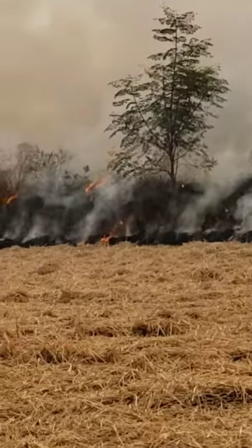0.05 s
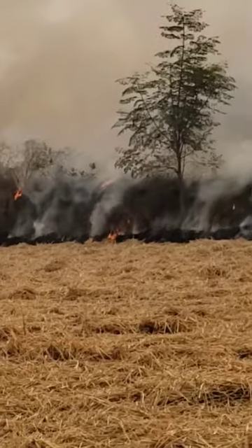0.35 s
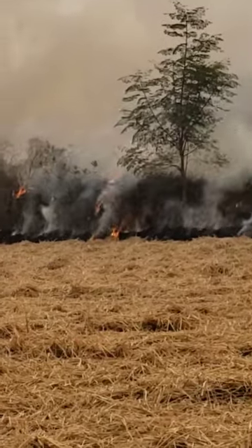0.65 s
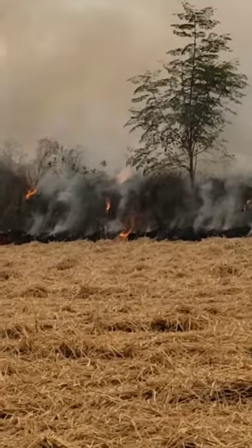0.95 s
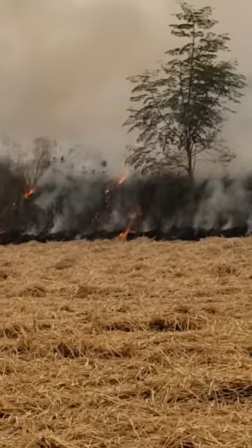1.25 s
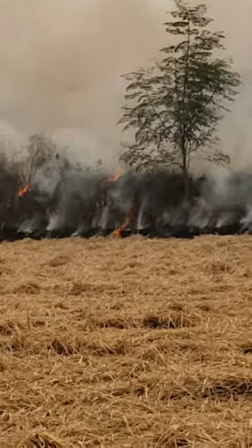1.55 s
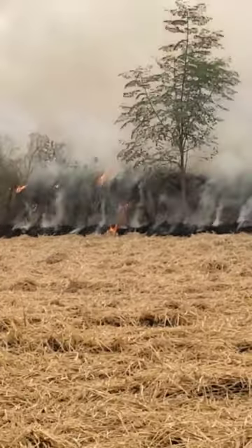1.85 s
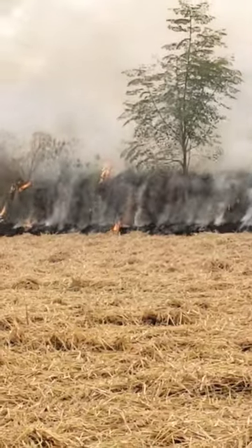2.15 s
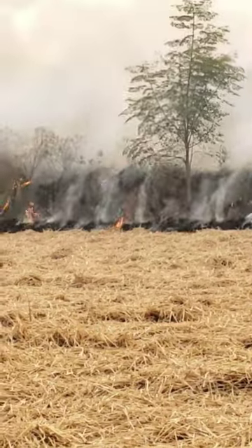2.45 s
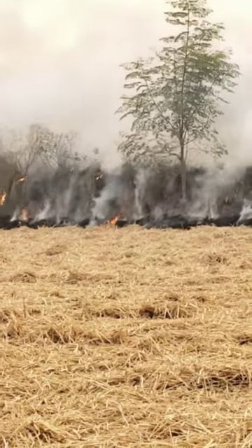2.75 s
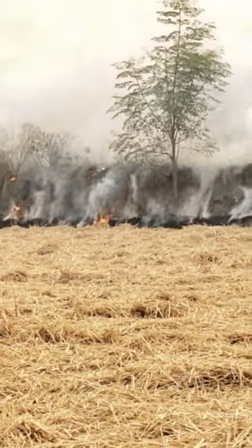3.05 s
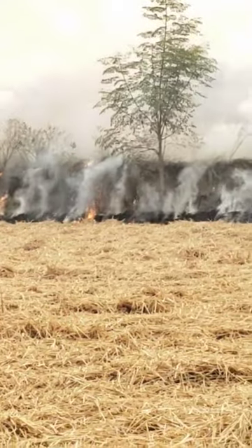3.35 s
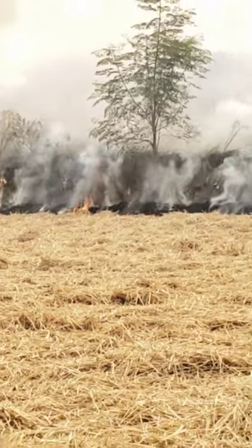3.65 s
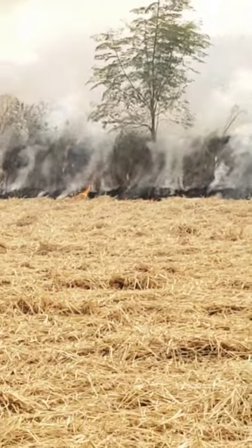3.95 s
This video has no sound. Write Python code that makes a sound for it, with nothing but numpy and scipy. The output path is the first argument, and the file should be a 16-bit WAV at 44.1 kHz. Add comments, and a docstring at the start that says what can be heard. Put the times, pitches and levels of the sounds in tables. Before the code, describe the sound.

A grass fire crackles steadily outdoors, left of the microphone, with frequent sharp snaps and a grainy hiss. The flames flutter softly over a low rumble of wind, and the crackling grows slightly stronger near the end.

```python
"""Sharp pops over dense crackle and sizzle: dry grass and straw burn at a field's edge, to the left.
Each bursting stalk radiates a shock of about one cycle, trailed by a few milliseconds of scatter from
the straw; countless tiny bursts superpose into hiss. Four dull thumps and one rustle lie among them.
The flames flutter with a soft roar; below them lie a wind rumble and a faint low drone."""
import sys
import numpy as np
from scipy.fft import rfft, irfft, next_fast_len
from scipy.io import wavfile
from scipy.ndimage import map_coordinates

SR = 44100
rng = np.random.default_rng(int(sys.argv[2]) if len(sys.argv) > 2 else 0)


def generate_wav(sig):
    """Save sig (samples, or channels by samples) to the path in sys.argv[1] as 16-bit PCM at SR."""
    pcm = np.round(np.clip(np.atleast_2d(sig).T, -1, 1) * 32767).astype(np.int16)
    wavfile.write(sys.argv[1], SR, pcm)


N = 176400
TOP_HZ = 15750  # band limit

# the loudest stalk bursts: t/s, shock peak level/dB, f/Hz, scatter re shock/dB
LOUD_BURSTS = [(0.0544, -13.5, 4930, 0), (0.1135, -18, 8100, -10), (0.1966, -2, 8900, -6),
               (0.3293, -18.5, 5010, -8), (0.4412, -9.5, 4540, -11), (0.6396, -19.5, 4630, 1),
               (0.7125, -11.5, 3530, -8), (0.7189, -10.5, 3020, -6.5), (0.7244, -18, 3000, 3),
               (0.7837, -14, 4300, -1), (0.7919, -4.5, 3650, -11), (0.7935, -12.5, 4000, -14),
               (0.8615, -14, 3480, -16), (0.9005, -11, 4860, 1.5), (0.9817, -20, 2900, -7),
               (1.0789, -15.5, 4280.0, -17), (1.1522, -13.5, 4370.0, -5), (1.1716, -16, 4770, 3),
               (1.2793, -20, 2800, 0), (1.3606, -16, 2150, -2.5), (1.4172, -11.5, 5170, -4),
               (1.4684, -13.5, 3820, -7), (1.4922, -10.5, 6400, -3), (1.5222, -14, 4930, -4),
               (1.677, -16, 4360, -5), (1.698, -16, 4700, -3), (1.7141, -13, 4430, 1),
               (1.8433, -11, 3280, 2.5), (1.8551, -13, 2930, -22), (1.913, -7, 3030, -0.5),
               (2.021, -22, 1800, 5.5), (2.0312, -15, 3510.0, -7), (2.0731, -12, 2800, -4),
               (2.1, -8, 5000, -24), (2.1181, -11.5, 4100, -4), (2.1453, -16, 3260.0, 3),
               (2.2075, -18, 6240.0, 3), (2.2291, -2, 4170, -9), (2.2294, -13.5, 10700, 0),
               (2.2337, -18, 4180, 6), (2.2706, -6.5, 4160, -20), (2.3891, -14, 3630.0, -13),
               (2.4285, -15.5, 5930, 1), (2.4365, -10.5, 4600, -6), (2.4822, -21.5, 5800, 7),
               (2.5525, -15.5, 3300, -7), (2.5992, -12, 3950, -19), (2.6287, -11.5, 4040.0, -13),
               (2.7708, -14.5, 3800, 1.5), (2.8203, -8, 8200, 1), (2.832, -14, 4300, 1),
               (2.8647, -13.5, 3680, -8), (2.9583, -17.5, 4100, -2), (2.998, -13.5, 4440, -2),
               (3.114, -18.5, 4200, 4.5), (3.1285, -13.5, 4350, -5), (3.2378, -13.5, 6100, 1.5),
               (3.264, -14.5, 4380, -3), (3.3133, -16.5, 3860.0, 5.5), (3.3895, -11, 3930, -1),
               (3.4019, -11, 4440, 1), (3.4392, -13, 3510.0, 2), (3.5727, -15, 3380, 1),
               (3.5992, -17, 5850, 7), (3.6594, -15.5, 4550, 5), (3.6891, -16.5, 5000, 8.5),
               (3.7749, -13, 5060, -6), (3.8404, -8.5, 11700, -5), (3.8711, -12, 3940, 2.5),
               (3.8807, -14, 5140, 2.5), (3.917, -12.5, 5000, 0.5), (3.959, -14, 3270, 2)]
def pops():
    """Impulsive radiation: the loudest stalks burst singly, each with a bright edge."""
    return bursts(LOUD_BURSTS, edge_gain=amp(-20.5))


# colour that ground and microphone give to all crackling: f/Hz, gain/dB
PATH_GAIN = [(450, -14.5), (800, -5), (960, -9.5), (1300, -1.5), (1620, -9.5), (2000, -1.5), (2230, -3.5),
             (2380, -17), (2580, -1.5), (3250, -4), (4150, -0.0), (4500, -2.5), (4830, 0.1), (5150, -6),
             (5500, -2), (5800, -7.5), (6070, -1), (6400, -8), (6800, -6), (7700, -15), (8900, -16),
             (11200, -5), (13000, -11), (15400, -12)]
def bursts(rows, q=1.15, edge_gain=0, edge_hz=10500, edge_q=4.7):
    """Damped resonance: each stalk gives a shock of about a cycle, followed by its scatter."""
    size, lead = 1024, 16  # samples
    onset, db, pitch, scatter_db = np.transpose(rows)[:, :, None]
    hz = np.fft.rfftfreq(size, 1 / SR)
    over = hz / (1.71 * pitch)
    shock = resonance(hz, pitch, q) / (1 - over ** 2 + 1j * over)  # low-pass above the pitch
    shock += edge_gain * resonance(hz, edge_hz, edge_q)
    shock *= 1j * hz / (1j * hz + 0.15 * pitch)  # high-pass below the pitch
    shock *= minimum_phase(amp(along(PATH_GAIN, hz))) * (hz < TOP_HZ)
    shock *= amp(db) / np.abs(irfft(shock)).max(axis=1, keepdims=True)
    shock *= np.exp(-2j * np.pi * hz * lead / SR)
    waves = irfft(shock * (1 + scatter(scatter_db, size)) * from_left(hz)[:, None])
    at = np.maximum(np.round(onset * SR).astype(int) - lead + np.arange(size), 0)
    return np.array([np.bincount(at.ravel(), wave.ravel(), N)[:N] for wave in waves])


def scatter(db, size, t60=0.011, rise_s=0.00032):
    """Scattering: the straw around each burst returns a decaying spray, given as stereo spectra."""
    t, hz = np.arange(size) / SR, np.fft.rfftfreq(size, 1 / SR)
    spray = rng.standard_normal((2, len(db), size))
    spray *= np.exp(0.31 * rng.standard_normal((len(db), size)))
    spray *= amp(-60 * t / t60) * (1 - np.exp(-(t / rise_s) ** 2))
    spray *= amp(db) / np.linalg.norm(spray, axis=-1, keepdims=True)
    return partly_coherent(rfft(spray), hz)


def crackle(heat_db, count=1300, centre_hz=3990, max_octaves=1.6, ceiling_db=-18):
    """Shot noise: small stalks burst at random times, louder where the fire flares."""
    at = rng.integers(0, N, count)
    strength, pitch, spray = rng.standard_normal((count, 3)).T
    octave = max_octaves * np.tanh(0.45 * pitch / max_octaves)
    db = -25.5 + 4.5 * strength + 0.79 * heat_db[at]
    db = ceiling_db - np.abs(ceiling_db - db)  # any excess folds back down
    db += 4 * np.minimum(octave, 0)  # low bursts peak less
    return bursts(np.column_stack([at / SR, db, centre_hz * 2 ** octave, -6 + 3 * spray]))


def ticks(heat_db, count=420, centre_hz=10370, ceiling_db=-21, scatter_db=-2):
    """Brittle fracture: the thinnest fibres snap with tiny, bright ticks."""
    at = rng.integers(0, N, count)
    strength, pitch = rng.standard_normal((count, 2)).T
    db = -33 + 6.5 * strength + 0.5 * heat_db[at]
    db = ceiling_db - np.abs(ceiling_db - db)
    hz = centre_hz * 2 ** (0.2 * pitch)
    return bursts(np.column_stack([at / SR, db, hz, np.full(count, scatter_db)]), q=2.4)


# sizzle spectrum before the path colours it: f/Hz, relative density level/dB
SIZZLE_SPECTRUM = [(200, -19), (600, -13), (1300, -8), (2200, -2.5), (4200, 0.5), (7000, 1), (11000, -3.5),
                   (15500, -6.5)]
def sizzle(heat_db, grain_db=4):
    """Superposition: countless tiny, distant bursts merge into a grainy hiss."""
    grains = rng.standard_normal((2, N))
    grains *= amp(grain_db * np.repeat(rng.standard_normal(N), 16)[:N])
    hiss = diffuse(grains, lambda hz: along(PATH_GAIN, hz) + along(SIZZLE_SPECTRUM, hz))
    return amp(-38.5 + heat_db + 2.7 * wobble(220)) * hiss


# how hard the fire burns: t/s, relative level/dB
BLAZE_LEVEL = [(0.0, -39.5), (0.22, -38), (0.65, -40.5), (0.9, -38), (1.3, -39), (1.58, -37.5),
               (1.79, -38.5), (2.26, -35.5), (2.66, -39), (2.81, -41), (2.9, -39.5), (3.24, -37),
               (3.55, -33.5), (4.0, -35)]
def heat(flare_db=1.48, flare_rate=28):
    """Common modulation: slow swells and quick flare-ups form one level curve, in dB."""
    return swell(BLAZE_LEVEL) + flare_db * wobble(flare_rate)


# dull thumps among the crackle: t/s, peak level/dB, t60/s
THUMP_EVENTS = [(0.062, -30.5, 0.004), (2.428, -39, 0.02), (2.82, -23.5, 0.0016), (2.958, -36, 0.0055)]
# their colour: f/Hz, gain/dB
THUMP_GAIN = [(90, -44), (200, -1), (350, -7), (550, -5), (850, -4.5), (1100, -3), (1500, -25.5),
              (3000, -19), (6000, -42)]
def thumps(push=7, size=8192):
    """Transient excitation: each thump is one low push with an exponentially decaying puff of noise."""
    out = np.zeros((2, N + size))
    t, hz = np.arange(size) / SR, np.fft.rfftfreq(size, 1 / SR)
    colour = minimum_phase(amp(along(THUMP_GAIN, hz))) * from_left(hz)
    for onset, db, t60 in THUMP_EVENTS:
        puff = rng.standard_normal(size) * amp(-60 * t / t60)
        thump = irfft((push + rfft(puff)) * colour)
        out[:, round(onset * SR):][:, :size] += amp(db) * thump / np.abs(thump).max()
    return out[:, :N]


# strength of the flames' roar: t/s, relative level/dB
FLAME_LEVEL = [(0.0, -57), (0.42, -51), (0.44, -54), (0.96, -57), (1.15, -54.5), (1.65, -54.5),
               (1.67, -46.5), (1.9, -52.5), (2.02, -48.5), (2.13, -47.5), (2.17, -52), (2.76, -55.5),
               (3.18, -53.5), (3.68, -52), (3.85, -55), (4.0, -50.5)]
# roar spectrum: f/Hz, relative density level/dB
ROAR_SPECTRUM = [(50, -28), (130, 0), (200, -1.5), (270, -2.5), (340, -8), (440, -17.5), (650, -31),
                 (1500, -27.5)]
def roar(heat_db, flutter_db=2.5, flutter_rate=55):
    """Combustion noise: the flames flutter in quick, soft gusts and jump when the fire flares."""
    db = -51 + 0.88 * swell(FLAME_LEVEL) + 0.31 * heat_db + flutter_db * wobble(flutter_rate)
    return amp(db) * diffuse(rng.standard_normal((2, N)), lambda hz: along(ROAR_SPECTRUM, hz))


def rustle(at_s=1.68, width_s=0.028, centre_hz=800, db=-46.5):
    """Band noise under a Gaussian envelope: one soft, low rustle swells and fades."""
    envelope = np.exp(-((np.arange(N) / SR - at_s) / width_s) ** 2)
    band = diffuse(rng.standard_normal((2, N)), lambda hz: -10 * np.log2((hz + 1) / centre_hz) ** 2)
    return amp(db) * envelope * band


# strength of the gusts: t/s, relative level/dB
GUST_LEVEL = [(0, -43.5), (0.17, -43), (0.45, -47.5), (0.7, -42.5), (1.1, -48), (1.8, -39.5), (2.7, -46),
              (3.1, -41.5), (4, -40.5)]
# wind spectrum: f/Hz, relative density level/dB
WIND_SPECTRUM = [(20, -22), (31, -14), (42, 5), (52, -1), (80, 3.5), (105, -3.5), (150, -11), (250, -23.5),
                 (500, -42.5)]
def rumble(shared=0.51, right_db=-2.5):
    """Turbulence: wind rumbles, partly alike on both sides; wind and drone swell with the gusts."""
    noise = rng.standard_normal((3, N))
    left, right, common = filtered(noise, lambda hz: amp(along(WIND_SPECTRUM, hz)))
    wind = unit(np.array([left, right]) + shared * common) * amp(-44 + 2.4 * wobble(11))
    return (wind + drone()) * amp(0.61 * swell(GUST_LEVEL)) * amp([[0], [right_db]])


# partials of the low drone: f/Hz, rms level before the gusts/dB
DRONE_PARTIALS = [(57.5, -47.5), (115.5, -54.5)]
def drone(waver_db=2.44, waver_hz=2.235):
    """Random modulation: two low tones, about an octave apart, waver in level and frequency."""
    out = np.zeros(N)
    for hz, db in DRONE_PARTIALS:
        amplitude = np.sqrt(2) * amp(db + waver_db * wobble(9.9))
        phase = 2 * np.pi * np.cumsum(hz + waver_hz * wobble(8)) / SR
        out += amplitude * np.sin(phase)
    return out


# the fire on the right side, relative to the left: f/Hz, gain/dB
RIGHT_SHADOW = [(150, -4), (300, -8), (800, -17), (1400, -15), (2700, -9.5), (4200, -14.5), (5300, -16),
                (8000, -25.5), (11000, -29), (15000, -47)]
def from_left(hz, lag_s=0.00008):
    """Acoustic shadow and travel time: the fire reaches the right side weaker and later."""
    right = amp(along(RIGHT_SHADOW, hz)) * np.exp(-2j * np.pi * hz * lag_s)
    return np.array([np.ones(len(hz)), right])


# likeness of the two sides for scattered sound: f/Hz, coherence (0-1)
COHERENCE = [(100, 0.92), (300, 0.92), (550, 0.1), (1300, 0.6), (2700, 0.24), (4500, 0.35), (7000, 0)]
def partly_coherent(pair, hz):
    """Partial coherence: two independent spectra mix into a left and a right one."""
    k = np.clip(along(COHERENCE, hz), 0, 1)
    return np.array([pair[0], k * pair[0] + np.sqrt(1 - k * k) * pair[1]])


def diffuse(pair, colour_db):
    """Diffuse sound: two noises form a wide source on the fire's side, rms 1 on the left."""
    hz = np.fft.rfftfreq(N, 1 / SR)
    x = irfft(partly_coherent(rfft(pair), hz) * from_left(hz) * amp(colour_db(hz)), N)
    return x / x[0].std()


def resonance(hz, centre_hz, q):
    """Band-pass response of a damped oscillator."""
    damping = 1j * hz * centre_hz / q
    return damping / (centre_hz ** 2 - hz ** 2 + damping)


def minimum_phase(gain):
    """Causality: folding the cepstrum gives the minimum-phase response with this gain."""
    cepstrum = irfft(np.log(gain + 1e-6))
    half = len(cepstrum) // 2
    cepstrum[1:half] *= 2
    cepstrum[half + 1:] = 0
    return np.exp(rfft(cepstrum))


def filtered(x, response):
    """Linear filtering: the spectrum of x times a frequency response."""
    size = next_fast_len(N + SR // 4)
    return irfft(rfft(x, size) * response(np.fft.rfftfreq(size, 1 / SR)), size)[..., :N]


def amp(db):
    """Level to amplitude ratio."""
    return 10 ** (np.asarray(db) / 20)


def unit(x):
    """Normalisation to rms 1."""
    return x / np.sqrt(np.mean(x ** 2) + 1e-20)


def along(points, hz):
    """Interpolation of (f/Hz, value) points on a log frequency axis."""
    f, value = np.transpose(points)
    return np.interp(np.log(hz + 1), np.log(f + 1), value)


def swell(rows):
    """Interpolation of (t/s, level/dB) points per sample, about their mean."""
    t, db = np.transpose(rows)
    return np.interp(np.arange(N) / SR, t, db - db.mean())


def wobble(rate):
    """Smooth random fluctuation, rate knots a second."""
    return map_coordinates(rng.standard_normal(2048), [np.arange(N) * rate / SR + 2], mode="wrap")


def scene():
    """Superposition: one blaze drives crackle, ticks, sizzle and roar; the wind rumbles beneath."""
    heat_db = heat()
    fire = crackle(heat_db) + ticks(heat_db) + sizzle(heat_db) + pops() + thumps() + rustle()
    return fire + roar(heat_db) + rumble()


def record(dry):
    """Band limiting: a steep low-pass removes the highest treble."""
    return filtered(dry, lambda hz: 1 / (1 + (hz / TOP_HZ) ** 160))


dry = scene()
out = record(dry)
generate_wav(out)
```